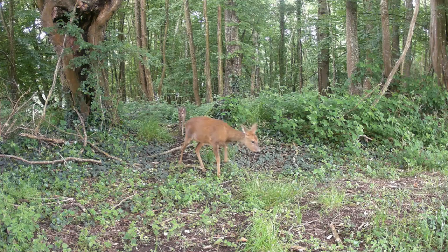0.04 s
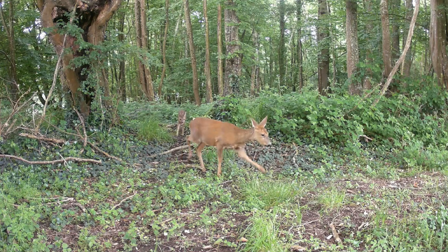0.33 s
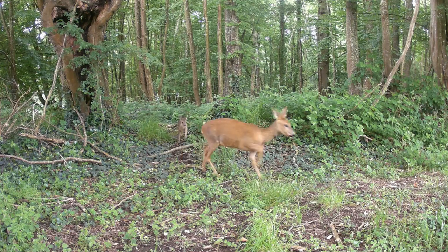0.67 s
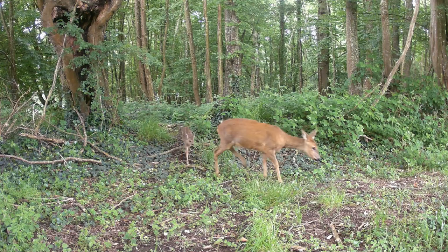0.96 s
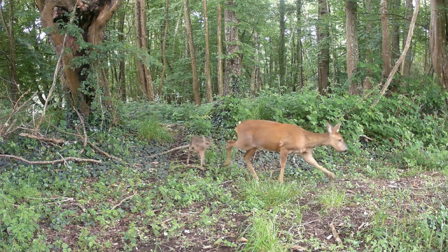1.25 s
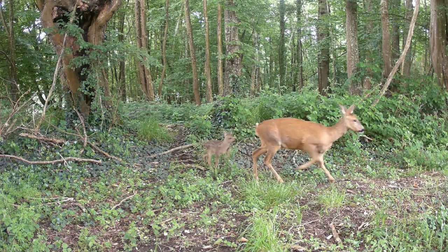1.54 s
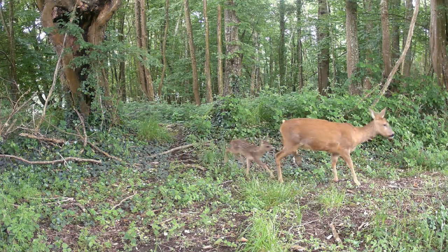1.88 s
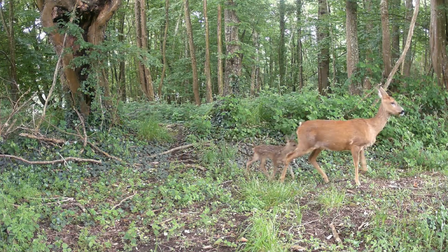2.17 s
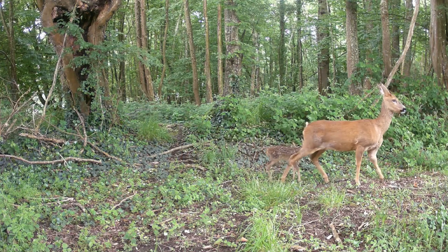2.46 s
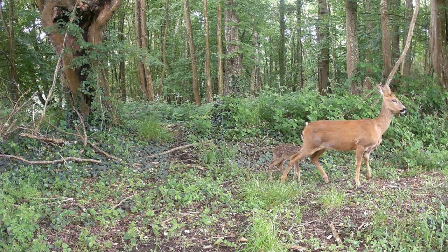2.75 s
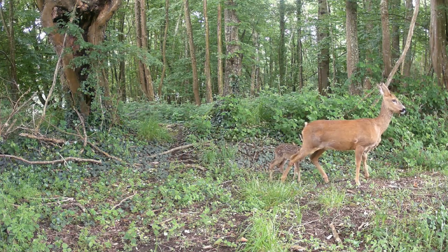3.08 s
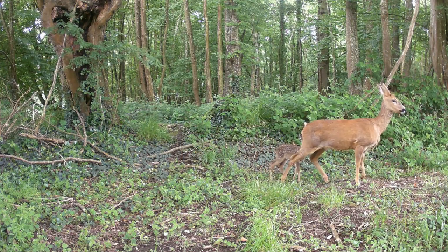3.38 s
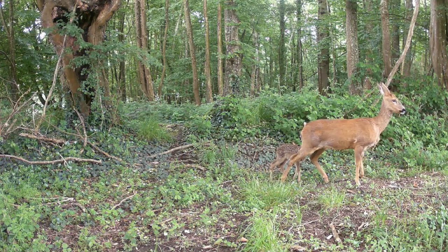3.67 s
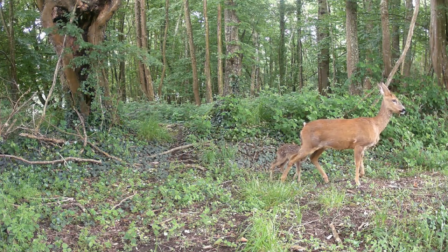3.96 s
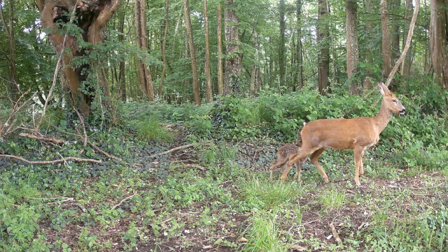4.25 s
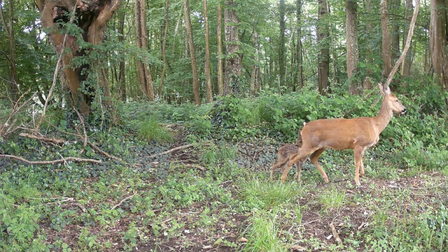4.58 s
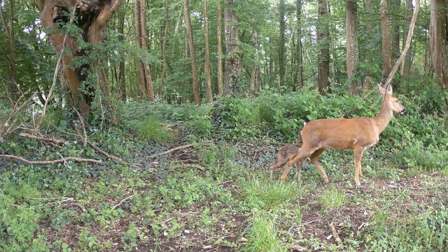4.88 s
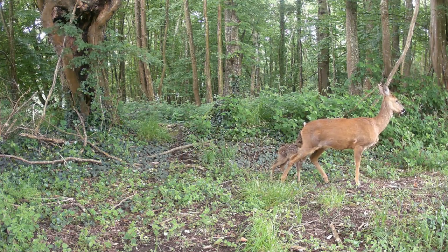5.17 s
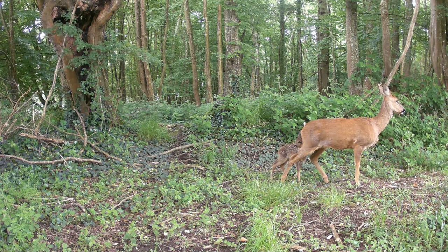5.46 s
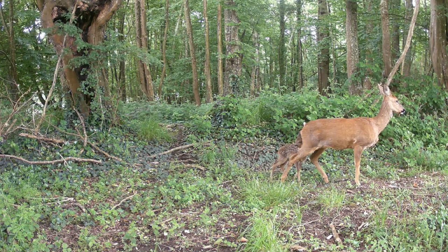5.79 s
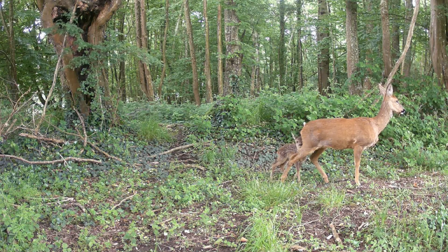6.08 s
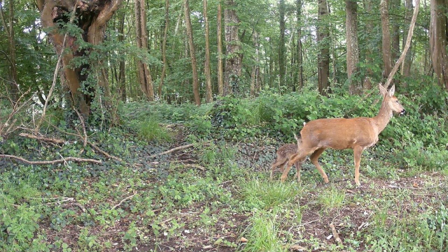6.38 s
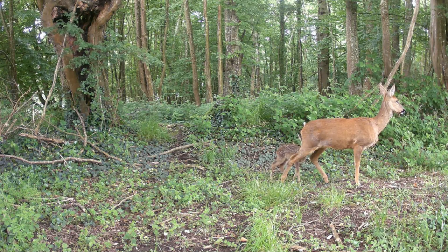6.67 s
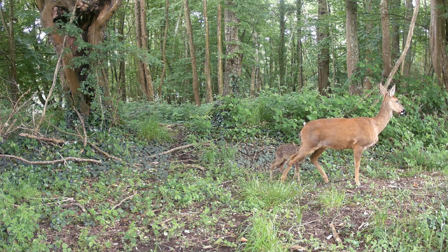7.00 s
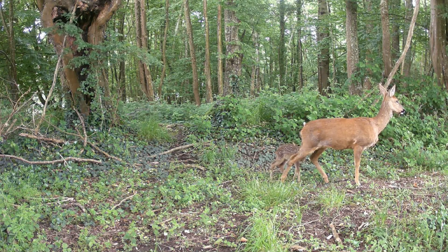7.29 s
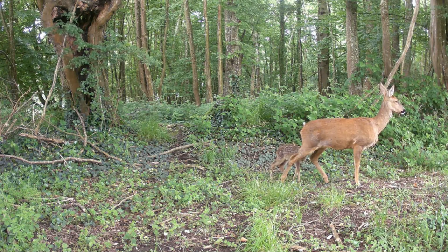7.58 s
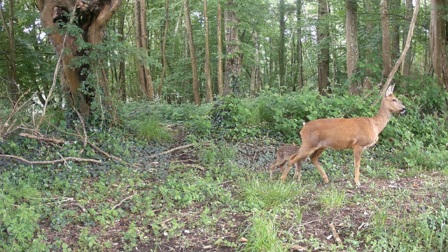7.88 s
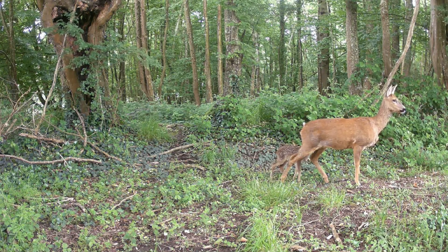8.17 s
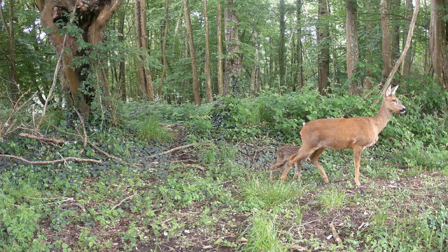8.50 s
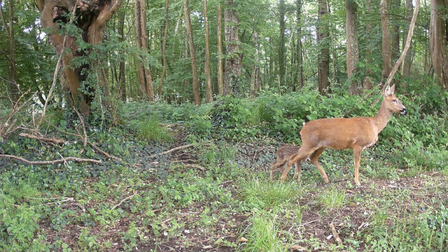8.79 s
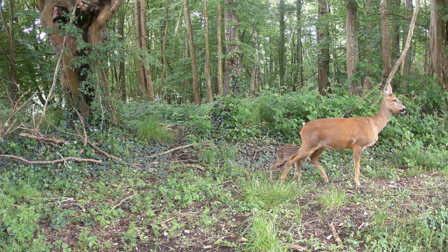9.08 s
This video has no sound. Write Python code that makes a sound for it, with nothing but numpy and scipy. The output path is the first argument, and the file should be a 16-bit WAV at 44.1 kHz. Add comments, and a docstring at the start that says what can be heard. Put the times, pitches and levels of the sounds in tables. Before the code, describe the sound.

Wind rumbles unevenly on an outdoor microphone in a wood, gentle at first and then with short low thumps. Behind it, small birds sing high falling whistles and a fast run of warbles and chips, busiest in the middle, while others answer softly from far away to the end. A deer's steps make a few barely audible ticks in dry leaves over a low hush.

```python
"""Birds at the edge of a wood

Small birds sing thin falling whistles and a quick warbled phrase, and others answer from far away.
Every note is a gliding pure tone that trunks and leaves scatter into a long tail.
Light gusts buffet the microphone, and dry leaves crackle faintly under hooves, over a quiet hush.
The sound fades up in the first second, with three soft clicks."""
import sys
import numpy as np
from scipy import signal
from scipy.fft import rfft, irfft
from scipy.io import wavfile
from scipy.ndimage import uniform_filter1d

SR = 44100
rng = np.random.default_rng(int(sys.argv[2]) if len(sys.argv) > 2 else 0)


def file_out(sig):
    """Save sig as 16-bit WAV at sys.argv[1]."""
    # one column per channel
    cols = np.atleast_2d(sig).T
    # limit, then scale
    lim = np.clip(cols, -1, 1)
    pcm = np.round(lim * 32767).astype(np.int16)
    wavfile.write(sys.argv[1], SR, pcm)


N = 403074
TIME = np.arange(N) / SR


def from_db(db):
    """Turn decibels into a number to multiply by."""
    return 10 ** (np.asarray(db) / 20)


def unit_power(x):
    """Scale a sound to an average power of one."""
    return x / np.sqrt(np.mean(x ** 2) + 1e-20)


def gain_curve(rows):
    """Join rows of (seconds, dB) into a gain for each sample."""
    return from_db(np.interp(TIME, *np.transpose(rows)))


def noise(colour):
    """Noise of unit power, shaped by rows of (Hz, dB)."""
    hz, db = np.transpose(colour)
    bin_hz = np.maximum(np.arange(N // 2 + 1) * SR / N, 1)
    shape = from_db(np.interp(np.log(bin_hz), np.log(hz), db))
    return unit_power(irfft(rfft(rng.standard_normal(N)) * shape, N))


def add(track, start_s, sound):
    """Mix a sound into a track at the given time."""
    start = max(int(start_s * SR), 0)
    track[start:start + len(sound)] += sound[:N - start]


# The tone of the hush. Each row: frequency in Hz, relative level in dB.
HUSH_COLOUR = [(25, 14), (100, 12.5), (200, 9), (350, 5.5), (500, 1), (1000, -3), (2200, -8), (3500, -14),
               (4100, -22.5), (4700, -27.5), (5600, -27.5), (6450, -21), (7300, -17.5), (7900, -30)]

def hush():
    """The quiet of the wood is a steady, mostly low noise."""
    return from_db(-63) * noise(HUSH_COLOUR)


# Soft clicks while the sound comes up. Each row: start in seconds, peak in dB.
OPENING_CLICKS = [(0.1992, -51), (0.2991, -55), (.402, -59.5)]

def opening_clicks(relax_s=0.27):
    """Each click is a small sudden step that eases back to zero."""
    out = np.zeros(N)
    for s, db in OPENING_CLICKS:
        add(out, s, -from_db(db) * np.exp(-TIME / relax_s))
    return out


# The tone of dry leaves. Each row: frequency in Hz, relative level in dB.
LEAF_COLOUR = [(500, -20), (2000, -6), (3500, 4), (5000, -9), (6500, 2), (8000, -3.5), (9000, -34.5)]
# How the rustle comes and goes. Each row: time in seconds, level in dB.
RUSTLE_LEVEL = [(0, -88), (.8, -86), (1.6, -84), (2.3, -90), (3.2, -109), (4.3, -78.5), (4.9, -81.5),
                (5.5, -104), (9.14, -106)]

def leaf_rustle(snaps_per_s=300, decay_s=.008):
    """Many tiny snaps of dry leaves under walking hooves merge into a soft rustle."""
    snaps = (rng.random(N) < snaps_per_s / SR) * from_db(2 * rng.standard_normal(N))
    envelope = signal.lfilter([1], [1, -np.exp(-1 / (decay_s * SR))], snaps + 1e-18)
    return gain_curve(RUSTLE_LEVEL) * unit_power(envelope * noise(LEAF_COLOUR))


# Single leaves under hooves. Each row: start in seconds, relative level in dB.
LEAF_TICKS = [(.778, -73.5), (1.073, -67.5), (1.127, -70.5), (1.513, -78), (2.193, -75), (2.625, -71),
              (4.238, -84), (4.425, -86), (4.609, -60), (4.757, -76)]

def leaf_ticks(decay_s=0.0073, low_hz=5800):
    """Each tick is a brief bright crackle that swells and dies."""
    out, t = np.zeros(N), TIME[:SR // 20]
    envelope = np.sqrt(t / decay_s) * np.exp(-t / decay_s)
    for s, db in LEAF_TICKS:
        add(out, s, from_db(db) * rng.standard_normal(len(t)) * envelope)
    return from_db(12.5) * signal.sosfilt(signal.butter(8, low_hz, "high", fs=SR, output="sos"), out)


def turbulence(strength, colour, span_s, split_hz, brightening, calm_db):
    """Lumpy noise that follows the wind; stronger gusts break into smaller, brighter swirls."""
    flow, span = noise(colour), int(span_s * SR)
    local_power = uniform_filter1d(uniform_filter1d(flow ** 2, span), span)
    flow = flow / np.sqrt(local_power + 1e-6)  # even out slow swells, keep fast lumps
    large = signal.sosfiltfilt(signal.butter(2, split_hz, fs=SR, output="sos"), flow)
    small = (flow - large) * (strength / from_db(calm_db)) ** brightening
    return strength * (large + small)


# Single bumps of wind. Each row: centre in seconds, flutter strength in dB, half the flutter's length
# in seconds, push level in dB, half the push's width in seconds.
BUFFETS = [(1.29, -64, .01, -40, 0.0053), (1.54, -58, .012, -35.5, 0.0038), (2.176, -63, .008, -42, 0.0043),
           (2.891, -55, .026, -33, 0.0034), (3.388, -27, 0.0066, -23.5, 0.0016),
           (3.431, -29.5, 0.011, -27.5, 0.0025), (3.626, -29, 0.0077, -31, 0.0016),
           (3.655, -28, 0.0096, -20, 0.0021), (3.767, -28.5, 0.0074, -19.5, 0.0021),
           (3.866, -35, 0.0042, -23, 0.0023), (3.961, -23, .013, -19.5, 0.0015),
           (4.02, -27, 0.015, -29, 0.0019), (4.07, -29, 0.013, -23.5, .0015),
           (4.156, -32.5, 0.0044, -19, 0.0032), (4.465, -30, 0.013, -25.5, .0016),
           (4.563, -24, 0.0066, -27, .0017), (4.607, -31.5, 0.029, -29, 0.0013),
           (4.701, -26.5, 0.011, -22, .0019), (4.79, -32.5, 0.017, -37, .002),
           (4.92, -43, 0.016, -29, .0022), (5.498, -39, 0.0064, -29, 0.0026),
           (5.631, -46, 0.015, -26.5, .0027), (6.218, -36.5, 0.016, -30.5, 0.0026),
           (6.269, -39, .015, -24.5, 0.0023), (6.348, -45, .011, -31.5, 0.0023),
           (6.495, -51, 0.013, -44, 0.0023), (6.617, -49.5, .007, -18, .0028),
           (6.88, -44.5, .016, -37, 0.0026), (7.086, -40.5, 0.011, -27.5, 0.0024),
           (7.251, -30, 0.004, -18, .0019), (7.306, -31, 0.0095, -25, 0.0024),
           (7.412, -43.5, 0.053, -27.5, 0.0035), (7.773, -41, 0.013, -30, 0.0025),
           (7.816, -35, 0.018, -22, 0.003), (8.127, -42.5, .019, -31, 0.0022),
           (8.407, -44.5, 0.0089, -30.5, 0.0028), (8.56, -55, 0.072, -39, 0.0047)]

def buffets():
    """A swirl of air crossing the microphone's opening gives one push between two shallow dips."""
    out = np.zeros(N)
    for s, _, _, db, half_s in BUFFETS:
        offset = np.arange(-5 * half_s, 5 * half_s, 1 / SR) / half_s
        push = (1 - offset ** 2) * np.exp(-offset ** 2 / 2)
        add(out, s - len(push) / 2 / SR, from_db(db) * push)
    return out


# The gusts. Each row: time in seconds, strength in dB.
WIND_STRENGTH = [(.2, -49), (.8, -56.5), (1.05, -62), (1.16, -44.5), (1.27, -46), (1.29, -37.5),
                 (1.36, -48.5), (1.52, -35.5), (1.63, -50), (1.68, -41), (1.77, -43.5), (1.81, -35),
                 (1.86, -40.5), (1.91, -32), (1.95, -50.5), (2.0, -49.5), (2.38, -53), (2.47, -44),
                 (2.84, -38), (3.08, -47.5), (3.15, -35), (3.22, -42), (3.34, -28.5), (3.43, -24),
                 (3.54, -37), (3.65, -24.5), (3.7, -34.5), (3.99, -27.5), (4.31, -34), (4.42, -60.5),
                 (4.47, -31.5), (4.51, -45), (4.56, -28.5), (4.7, -33.5), (4.76, -24), (4.87, -35),
                 (5.06, -36.5), (5.12, -54), (5.23, -52), (5.44, -39.5), (5.51, -26), (5.53, -33),
                 (5.76, -35.5), (5.81, -52), (5.85, -32.5), (5.97, -49), (6.24, -26.5), (6.42, -35),
                 (6.51, -29), (6.58, -37), (6.62, -23.5), (6.69, -36.5), (7.08, -31), (7.3, -27.5),
                 (7.37, -37), (7.44, -28), (7.71, -44.5), (7.78, -23.5), (7.87, -35), (8.14, -39),
                 (8.25, -50.5), (8.37, -38), (8.55, -31), (8.78, -49.5), (9.14, -49)]
# The tones of the rumble and the flutter. Each row: frequency in Hz, relative level in dB.
RUMBLE_COLOUR = [(12, -5), (22, 9.5), (36, 2), (55, 0.5), (90, -9.5), (120, -21), (170, -38), (300, -90)]
FLUTTER_COLOUR = [(60, -8), (105, 12.5), (150, 4), (200, -3), (260, -14.5), (340, -24), (450, -34),
                  (700, -59), (1200, -75.5)]

def wind(lump_db=1.4, lump_s=.04):
    """Wind on the microphone: a deep rumble, and a flutter above it that flares with each buffet."""
    lump_times = np.arange(0, TIME[-1], lump_s)
    lumps = lump_db * rng.standard_normal(1024)[:len(lump_times)]  # chance swells and dips
    strength = gain_curve(WIND_STRENGTH) * from_db(np.interp(TIME, lump_times, lumps))
    flares = np.zeros(N)
    for s, db, half_s, *_ in BUFFETS:
        offset = np.arange(-4 * half_s, 4 * half_s, 1 / SR) / half_s
        add(flares, s - len(offset) / 2 / SR, from_db(db) * np.exp(-offset ** 2 / 2))
    rumble = turbulence(strength, RUMBLE_COLOUR,
                        span_s=0.066, split_hz=50, brightening=0.33, calm_db=-36.5)
    flutter = turbulence(from_db(-20.5) * strength + flares, FLUTTER_COLOUR,
                         span_s=0.016, split_hz=257, brightening=0.65, calm_db=-37.5)
    return from_db(0.6) * rumble + from_db(-4.0) * flutter


def foliage(note, smear_db, smear_s=0.0017):
    """Leaves along the way smear a note over a few milliseconds, keeping its energy."""
    t = TIME[:SR // 30]
    smear = rng.standard_normal(len(t)) * np.exp(-t / smear_s)
    path = from_db(smear_db) * smear / np.linalg.norm(smear)
    path[0] += 1  # the part that passes straight through
    heard = signal.fftconvolve(note, path)
    return heard * np.linalg.norm(note) * np.linalg.norm(path) / np.linalg.norm(heard)


def wood(x, direct_db, early_db, tail_db, early_s, tail_s=1.08, build_s=0.022):
    """Direct sound, quick echoes from nearby trunks and a long tail from deep in the wood."""
    t = TIME[:SR * 3 // 2]
    early, tail = rng.standard_normal((2, len(t))) * (1 - np.exp(-t / build_s))
    early *= from_db(-60 * t / early_s)
    tail *= from_db(-60 * t / tail_s)
    echoes = from_db(early_db) * early / np.linalg.norm(early)
    echoes += from_db(tail_db) * tail / np.linalg.norm(tail)
    return from_db(direct_db) * x + signal.fftconvolve(x, echoes)[:N]


def song(notes, waver, smear_db=-10, rasp=0, waver_step_s=0.004005, rasp_step_s=.0011):
    """Each note is a pure tone bending through three pitches; waver shakes its pitch, rasp its level."""
    out = np.zeros(N)
    for s, length, start_hz, middle_hz, end_hz, db in notes:
        along = np.linspace(0, 1, int(length * SR))
        bend = np.polyval(np.polyfit([0, .5, 1], np.log([start_hz, middle_hz, end_hz]), 2), along)
        wobbles, flutters = rng.standard_normal((2, 256))
        grain = 1 + rasp * np.interp(along * length / rasp_step_s, np.arange(256), flutters)
        tremble = np.interp(along * length / waver_step_s, np.arange(256), wobbles)
        phase = 2 * np.pi * np.cumsum(np.exp(bend + waver * tremble)) / SR
        soft_ends = signal.windows.tukey(len(along), .3)
        note = from_db(db) * unit_power(grain * np.sin(phase)) * soft_ends
        add(out, s, foliage(note, smear_db))
    return out


def glides(rows, early_share):
    """Notes that cover the given share of their glide in their first half."""
    return [(s, length, start, start * (end / start) ** early_share, end, db)
            for s, length, start, end, db in rows]


def trill(syllable, start_s, period_s, count, octaves=0, level_db=0, step_octaves=0, step_db=0):
    """A syllable (a few notes) repeated at a steady pace; pitch and level can step each time."""
    return [(start_s + k * period_s + delay, length,
             *np.multiply(pitches, 2 ** (octaves + k * step_octaves)), db + level_db + k * step_db)
            for k in range(count) for delay, length, *pitches, db in syllable]


def chorus(count, from_s, to_s, low_hz, high_hz, db, sweep_share=.19):
    """Short chirps at random times and pitches within a range."""
    when, pitch, slope, softness = rng.random((count, 4)).T
    starts, lengths = from_s + when * (to_s - from_s), np.full(count, .05)
    hz = low_hz * (high_hz / low_hz) ** pitch
    sweep = 1 + sweep_share * (slope - .5)
    return song(zip(starts, lengths, hz / sweep, hz, hz * sweep, db - 8 * softness), waver=0.014)


# Far twitters. Each row: start and length in seconds, pitch in Hz, relative level in dB.
TWITTERS = [(0.449, 0.17, 3950, -84), (.87, .1, 4800, -90), (1.15, 0.13, 3720, -82),
            (1.587, 0.11, 5740, -88), (1.618, 0.13, 3650, -80), (1.753, 0.083, 3930, -80.5),
            (1.978, 0.13, 3850, -76), (2.178, 0.11, 4010, -82), (2.547, 0.054, 4500, -80.5),
            (2.552, 0.045, 3600, -78.5), (2.769, 0.08, 4140, -77), (3.168, 0.073, 4690, -85),
            (3.575, 0.077, 4240, -78), (7.649, 0.096, 3550, -77), (7.85, 0.06, 3040, -78),
            (7.896, 0.11, 3886, -79), (8.187, .12, 4050, -80), (8.08, 0.079, 3684, -79),
            (8.434, .12, 3660, -79), (8.52, 0.19, 3310, -81), (8.682, 0.1, 4450, -79.5),
            (8.717, .1, 3595, -78.5), (8.838, 0.094, 3770, -78), (8.941, .13, 4080, -75.5)]

def far_twitters(chirp_s=0.033, step_s=.018, spread_octaves=.06):
    """Flurries of tiny chirps swell and fade among a faint crowd of other birds."""
    crowd = chorus(130, from_s=0, to_s=9.1, low_hz=2220, high_hz=3880, db=-84.5)
    crowd += chorus(50, from_s=1.2, to_s=4.2, low_hz=4370, high_hz=6140, db=-85)
    notes = []
    for s, length, hz, db in TWITTERS:
        chance = rng.uniform(-0.91, 1, (32, 2))
        for delay, (offset, slope) in zip(np.arange(0, length, step_s), chance):
            swell_db = 20 * np.log10(np.sin(np.pi * (delay + step_s) / (length + 2 * step_s)))
            pitches = hz * 2 ** (spread_octaves * (offset + slope * np.array([-1, 0, 1])))
            notes.append((s + delay, chirp_s, *pitches, db + swell_db))
    voice = song(notes, waver=.03, smear_db=-1.5, rasp=0.38)
    return wood(voice + crowd, direct_db=-6.5, early_db=-9.5, tail_db=-5.5, early_s=0.43)


# Low whistles. Each row: start and length in seconds, middle pitch in Hz, relative level in dB.
FAR_WHISTLES = [(.93, 0.19, 1873, -75), (1.27, 0.051, 1706, -76), (1.34, 0.12, 2390, -75.5),
                (1.48, 0.13, 2273, -76), (1.755, 0.055, 2040, -74), (6.6, 0.055, 2150, -75.5),
                (7.16, 0.1, 2205, -75), (7.3, 0.059, 2058, -72), (7.52, 0.071, 2230, -74)]
# A two-tone call. Each row: delay and length in seconds, start, middle and end pitch in Hz,
# relative level in dB.
SEESAW = [(0, 0.071, 7210, 6970, 6980, -80), (.055, .09, 5730, 5724, 5910, -78.5)]

def far_birds(sag_octaves=.08):
    """Low whistles that sag a little, and a high two-tone call heard five times."""
    sag = 2 ** (sag_octaves / 2)
    notes = [(s, length, hz * sag, hz, hz / sag, db) for s, length, hz, db in FAR_WHISTLES]
    notes += trill(SEESAW, start_s=2.22, period_s=.2, count=2, level_db=-0.5)
    notes += trill(SEESAW, start_s=3.98, period_s=.2, count=1, level_db=1.5, octaves=0.021)
    notes += trill(SEESAW, start_s=8.39, period_s=.19, count=2)
    return wood(song(notes, waver=.01), direct_db=-5, early_db=-6, tail_db=-5.5, early_s=0.27)


# Clear notes. Each row: start and length in seconds, start and end pitch in Hz, relative level in dB.
FLUTED_NOTES = [ (2.81, 0.093, 3200, 3170, -75.5), (3.295, 0.08, 2230, 2060, -59.5),
                (3.36, 0.078, 2100, 2054, -64), (3.37, 0.12, 3104, 3080, -70),
                (3.43, 0.13, 2070, 2040, -72.5), (5.945, 0.025, 2200, 2370, -75),
                (6.1, 0.1, 2480, 2600, -73.5), (6.68, 0.042, 2960, 3110, -76),
                (6.77, 0.15, 3110, 2980, -81.5), (7.035, 0.076, 2670, 2980, -70.5),
                (7.2, 0.037, 3280, 3380, -75.5), (7.25, .044, 2670, 2980, -77),
                (7.45, 0.052, 2650, 3000, -72.5), (7.722, 0.088, 2350, 2280, -65.5)]
FALLING_CALLS = [(6.235, .045, 3920, 3600, -80.5), (6.47, 0.058, 3810, 3070, -76.5),
                 (6.735, .04, 3780, 3330, -79.5), (6.94, 0.09, 3910, 3090, -77)]

def fluting_bird():
    """Flute-like notes that settle quickly on their pitch, and four falling calls."""
    notes = glides(FLUTED_NOTES, early_share=.8) + glides(FALLING_CALLS, early_share=.55)
    return wood(song(notes, waver=0.0065), direct_db=-4, early_db=-10, tail_db=-10.5, early_s=0.24)


# Two thin syllables. Each row: delay and length in seconds, start, middle and end pitch in Hz,
# relative level in dB.
THIN_SLUR = [(0, .02, 5520, 5770, 5950, -73), (.045, 0.033, 6300, 5690, 5500, -71)]
CHIP_AND_FLICK = [(0, .026, 5350, 5620, 5800, -71.5), (.063, 0.02, 5600, 4530, 3550, -74)]

def chipping_bird():
    """Three thin sliding calls lead into an even trill of chips."""
    notes = trill(THIN_SLUR, start_s=2.62, period_s=0.23, count=3, level_db=-7.5, step_db=2.5)
    notes += trill(CHIP_AND_FLICK, start_s=3.251, period_s=.1365, count=5, step_db=1.3)
    voice = song(notes, waver=0.012, smear_db=-3)
    return wood(voice, direct_db=-6, early_db=-10.5, tail_db=-7.5, early_s=0.15)


# High notes. Each row: start and length in seconds, start and end pitch in Hz, relative level in dB.
HIGH_WHISTLES = [ (2.685, .034, 7710, 6920, -57), (2.797, 0.03, 7530, 7190, -54),
                 (2.822, 0.043, 7420, 6680, -53.5), (2.925, 0.033, 7230, 7130, -54),
                 (2.952, 0.023, 6980, 6430, -50.5), (2.975, 0.032, 6680, 6120, -55),
                 (3.645, 0.033, 7790, 7700, -67.5), (3.71, 0.057, 7780, 7580, -62.5),
                 (3.765, 0.15, 7400, 6690, -74), (4.365, 0.03, 7390, 7250, -63.5),
                 (4.522, 0.044, 7560, 6440, -61.5), (4.552, 0.041, 6400, 6030, -60.5),
                 (4.56, 0.031, 7390, 6860, -58.5)]

def high_whistler():
    """Thin, slightly raspy whistles fall in three short groups."""
    voice = song(glides(HIGH_WHISTLES, early_share=.45), waver=0.011, smear_db=-2.5, rasp=.35)
    return wood(voice, direct_db=-8.5, early_db=-6, tail_db=-9.5, early_s=.38)


# A free warble. Each row: start and length in seconds, start and end pitch in Hz, relative level in dB.
WARBLE = [ (1.972, 0.035, 4280, 3950, -66.5), (2.046, 0.014, 3880, 3430, -63),
          (2.164, .018, 3550, 4150, -61), (2.19, 0.043, 4100, 3900, -70.5), (3.086, 0.015, 3680, 4300, -63),
          (3.104, 0.031, 4150, 3850, -60), (3.19, 0.022, 2560, 2680, -62.5),
          (3.245, 0.038, 2700, 2287, -64), (4.0, .06, 4400, 4120, -70.5), (4.08, 0.027, 2810, 3550, -56.5),
          (4.172, .034, 3380, 3846, -51), (4.205, 0.021, 4330, 3030, -54.5),
          (4.238, .03, 3350, 4064, -56.5), (4.282, 0.025, 4130, 3880, -55), (4.29, 0.027, 4140, 4550, -67),
          (4.64, .04, 3750, 4550, -63), (4.7, 0.055, 4250, 3500, -64.5), (4.78, 0.033, 4300, 3700, -67),
          (4.825, .036, 4650, 3900, -68), (4.865, 0.076, 2800, 2720, -67), (4.91, 0.044, 3910, 4750, -69),
          (4.98, 0.037, 4600, 3360, -71.5), (5.045, .018, 4300, 5000, -66.5),
          (5.058, .016, 4900, 5800, -68.5), (5.075, 0.067, 3140, 3100, -62.5),
          (5.228, 0.034, 2750, 3500, -60), (5.26, 0.03, 3750, 2900, -61.5), (5.292, 0.018, 2900, 3810, -63),
          (5.315, 0.043, 3400, 2290, -65.5)]
# A rising syllable. Its row: delay and length in seconds, start, middle and end pitch in Hz,
# relative level in dB.
UPSWEEP = [(0, 0.021, 3300, 3800, 4650, -66.5)]

def warbler():
    """A quick warble with three rising sweeps and clusters of soft chirps."""
    soft = chorus(30, from_s=4.2, to_s=5.0, low_hz=2905, high_hz=4280, db=-65.5, sweep_share=.22)
    soft += chorus(12, from_s=4.64, to_s=5.0, low_hz=3950, high_hz=4500, db=-69.5, sweep_share=.13)
    soft += chorus(10, from_s=3.16, to_s=3.28, low_hz=2690, high_hz=3750, db=-69.5, sweep_share=.25)
    notes = trill(UPSWEEP, start_s=3.572, period_s=.136, count=3, level_db=0.5, step_db=2)
    notes += glides(WARBLE, early_share=.52)
    voice = song(notes, waver=.028, smear_db=-2, rasp=.4)
    return wood(voice + soft, direct_db=-8, early_db=-7.5, tail_db=-6.5, early_s=.22)


# A fast run. Each row: start and length in seconds, start and end pitch in Hz, relative level in dB.
TUMBLE = [(3.117, 0.0087, 3780, 3450, -60), (3.148, 0.012, 3600, 3300, -59),
          (3.176, 0.011, 3770, 3460, -57.5), (3.214, 0.013, 3260, 2780, -55),
          (3.23, .012, 2690, 2200, -61.5), (3.244, 0.016, 2570, 3190, -58),
          (3.283, .011, 3260, 2780, -57.5)]
# Syllables named for the shape of their pitch. Each row: delay and length in seconds, start, middle
# and end pitch in Hz, relative level in dB.
HOOK = [(0, .022, 3880, 2893, 2365, -58.5), (.018, 0.011, 2490, 2416, 2520, -61.5),
        (.035, .009, 2500, 2950, 3700, -67.5)]
DIP = [(0, .04, 3427, 2720, 2190, -61.5), (.038, .056, 2367, 2777, 3800, -61.5)]
ARCH = [(0, 0.029, 2290, 2388, 3070, -61), (.023, .015, 2950, 3090, 3000, -59),
        (.036, .038, 2550, 2020, 1715, -66)]
LOW_SLUR = [(0, 0.062, 2450, 2250, 2020, -62)]

def near_warbler():
    """A tumbling run, two soft hooks and four loud ones, two dips, three arches and two low slides."""
    notes = glides(TUMBLE, early_share=0.48)
    notes += trill(HOOK, start_s=3.815, period_s=.108, count=2, step_db=1, level_db=-8, octaves=-.021)
    notes += trill(HOOK, start_s=3.976, period_s=.057, count=4, step_octaves=-.025, step_db=-1.2)
    notes += trill(DIP, start_s=4.266, period_s=.194, count=2)
    notes += trill(ARCH, start_s=4.625, period_s=.1355, count=3)
    notes += trill(LOW_SLUR, start_s=5.163, period_s=.15, count=2, step_octaves=-.039, step_db=-4.5)
    voice = song(notes, waver=.018, smear_db=-1, rasp=0.43)
    return wood(voice, direct_db=-7, early_db=-9.5, tail_db=-9.5, early_s=.09)


# The opening fade. Each row: time in seconds, gain in dB.
FADE_IN = [(0, -93), (.19, -45), (.2, -20.5), (.4, -8.5), (.6, -5.5), (.8, 0), (1.1, 0.5), (9.14, 0.5)]

def scene():
    """The hush, birds, leaves and wind fade up together in one channel."""
    outdoors = hush() + high_whistler() + warbler() + near_warbler()
    outdoors += chipping_bird() + fluting_bird() + far_birds() + far_twitters()
    outdoors += leaf_ticks() + leaf_rustle() + wind() + buffets()
    return (gain_curve(FADE_IN) * outdoors + opening_clicks())[None]


def record(dry, cutoff_hz=7780, hiss_db=-100):
    """The highest treble is cut steeply; a very faint hiss sets in with the first click."""
    cut = signal.sosfilt(signal.ellip(14, .1, 80, cutoff_hz, fs=SR, output="sos"), dry)
    hiss_on = TIME > OPENING_CLICKS[0][0]
    return cut + hiss_on * from_db(hiss_db) * rng.standard_normal(dry.shape)


dry = scene()
out = record(dry)
file_out(out)
```